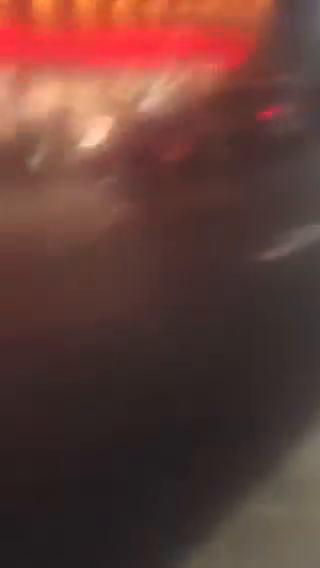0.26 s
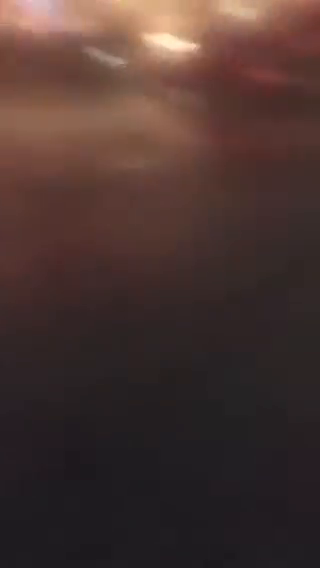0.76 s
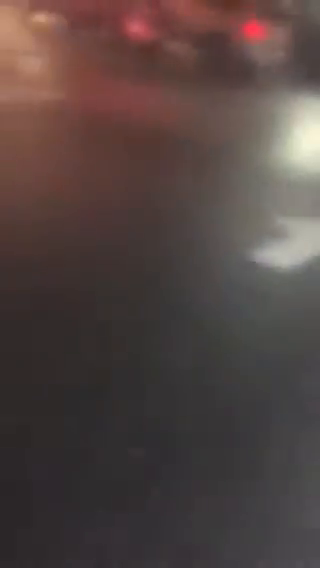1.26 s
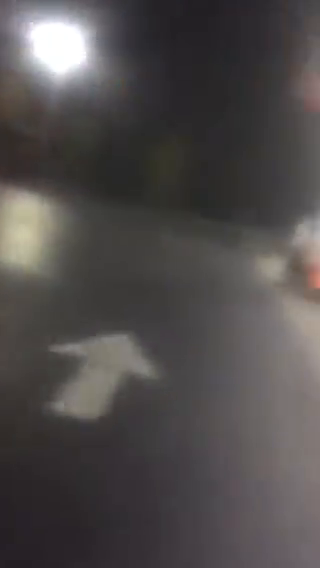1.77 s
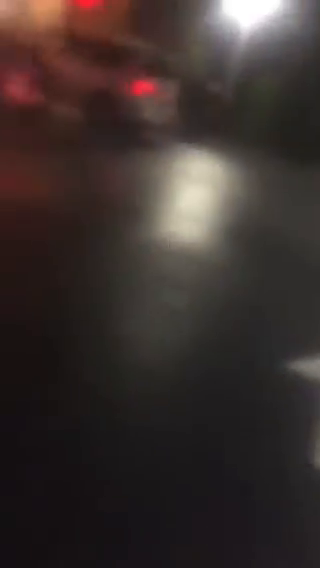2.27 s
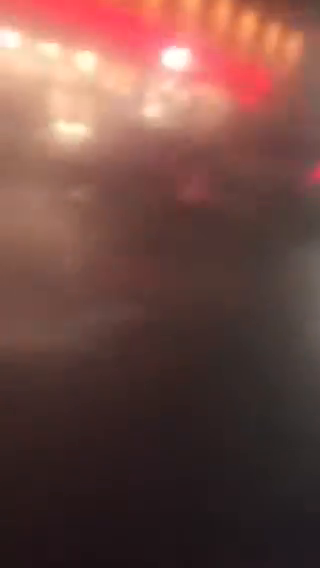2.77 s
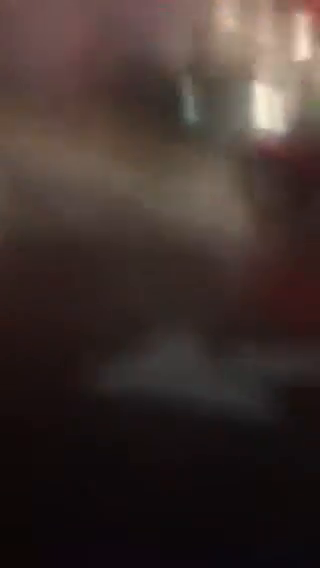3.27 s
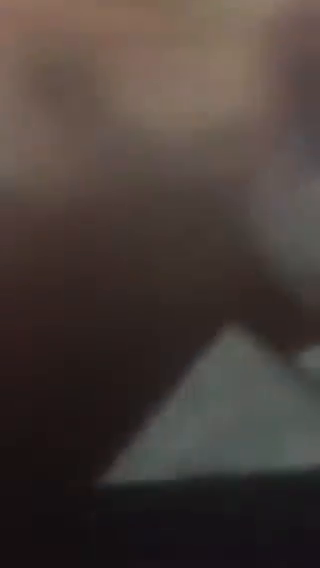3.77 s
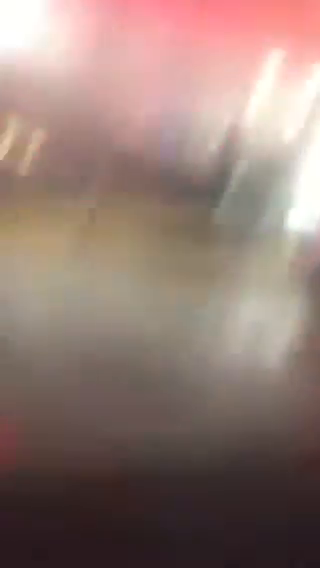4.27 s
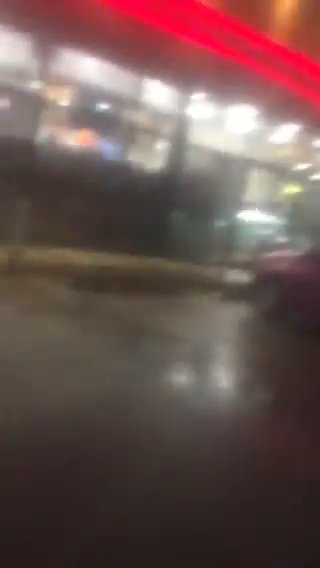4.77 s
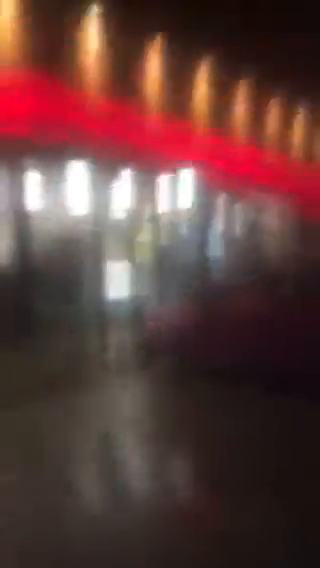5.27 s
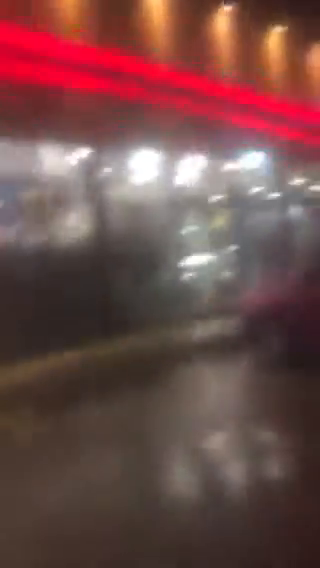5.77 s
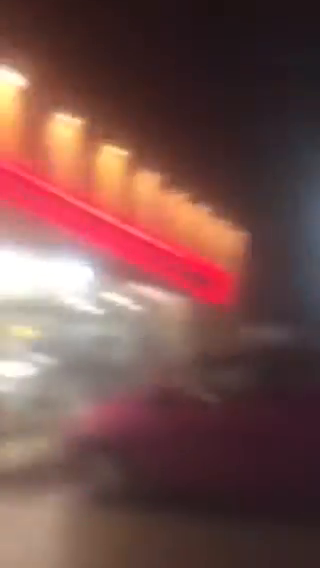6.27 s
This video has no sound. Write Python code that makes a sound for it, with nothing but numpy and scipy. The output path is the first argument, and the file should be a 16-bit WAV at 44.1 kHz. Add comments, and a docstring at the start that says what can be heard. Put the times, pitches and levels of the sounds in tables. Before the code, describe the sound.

Very close, dry outdoor sound of rain on an umbrella: irregular sharp splashes, hollow knocks and tiny ticks over faint hissing rain. Low gusts shake and rustle the fabric, strongest around three seconds, followed by crisp creasing snaps and a dense run of hits. Later the treble is slightly duller, and one smack overloads the microphone.

```python
"""A night downpour on wet pavement, heard from under an umbrella whose cloth is just above the microphone.
From the start, filtered noise makes the roar of rain, hissing spray, low buffeting and rustling cloth.
Light drops patter and heavy ones smack the cloth throughout: noise splashes with falling, knocking tones.
Wind swells near 1 s and strongest near 2.9 s; from 3.2 to 3.9 s the cloth snaps amid a thick run of drops.
The treble dulls a little until 4.7 s; the hardest smack, near 5.5 s, flattens against the microphone's limit."""
import sys
import numpy as np
from scipy import signal
from scipy.fft import rfft, irfft, next_fast_len
from scipy.io import wavfile

SR = 44100
rng = np.random.default_rng(int(sys.argv[2]) if len(sys.argv) > 2 else 0)


def dump_mix(stems):
    """Bounce the given channels to the path in sys.argv[1] as a 16-bit WAV at rate SR."""
    frames = np.atleast_2d(stems).T  # one column per channel
    limited = np.clip(frames, -1, 1)  # hard clip at full scale
    pcm = np.round(limited * 32767).astype(np.int16)
    wavfile.write(sys.argv[1], SR, pcm)


N = 287091
TIME = np.arange(N) / SR
AGE = np.arange(4096) / SR  # seconds since a drop or snap began


def gain_of(db):
    """Decibels to amplitude."""
    return 10 ** (np.asarray(db) / 20)


def evened(x):
    """Scales to an rms of one."""
    return x / np.sqrt(np.mean(x ** 2) + 1e-20)


def add(mix, s, sound):
    """Mixes a sound in at time s, cutting it off at the end of the mix."""
    part = mix[max(round(s * SR), 0):][:len(sound)]
    part += sound[:len(part)]


def coloured(x, spectrum):
    """Filters x by (frequency [Hz], level [dB]) points joined on a log-frequency axis."""
    hz, db = np.transpose(spectrum)
    size = next_fast_len(len(x))
    bins = np.fft.rfftfreq(size, 1 / SR)
    gain = gain_of(np.interp(np.log(bins + 1), np.log(hz), db))
    return irfft(rfft(x, size) * gain, size)[:len(x)]


def wander(rate_hz):
    """Slow random drift with an rms of about one: noise smoothed above rate_hz."""
    coarse = rng.standard_normal(4000)
    bins = np.fft.rfftfreq(len(coarse), TIME[-1] / len(coarse))
    smooth = irfft(rfft(coarse) / (1 + (bins / rate_hz) ** 2))
    return np.interp(TIME, np.linspace(0, TIME[-1], len(coarse)), evened(smooth))


def curves(table):
    """Each column of a table of (time [s], ...) points, joined by straight lines."""
    s, *columns = np.transpose(table)
    return [np.interp(TIME, s, column) for column in columns]


def burst(decay_s):
    """A puff of noise that starts at once and dies away."""
    return rng.standard_normal(len(AGE)) * np.exp(-AGE / decay_s)


def flex(hz, sag_cycles, life_cycles):
    """Cloth swings ever slower as the dent spreads: a short falling knock, uneven from swing to swing."""
    turns = sag_cycles * np.log1p(hz * AGE / sag_cycles)
    # a random phase shift at every half swing
    unevenness = np.interp(2 * turns, np.arange(64), rng.standard_normal(64)) * .11
    attack = 1 - np.exp(-turns / .3)
    decay = np.exp(-(turns / life_cycles) ** 1.5)
    return attack * decay * np.sin(2 * np.pi * (turns + unevenness))


# tone of the rain's roar: (frequency [Hz], relative level [dB])
WASH_TONE = [(80, -10.5), (250, 3), (600, 18), (1200, 6), (2300, 7), (4000, 2), (5200, -8), (9000, -46)]


def wash(rain_db, level_db=-5.5, flutter_db=3.0):
    """Countless faint drops blur into a roar of noise that flutters at random."""
    roar = evened(coloured(rng.standard_normal(N), WASH_TONE))
    return roar * gain_of(rain_db + level_db + flutter_db * wander(rate_hz=69))


# tone of the spray: (frequency [Hz], relative level [dB])
SPRAY_TONE = [(300, -15), (1500, 13), (3000, 0), (4900, 4), (6000, 4.5), (10500, 1.5), (11800, 3),
              (15500, -6)]
# swells of the spray, before its overall level: (time [s], level [dB])
HISS_SWELLS = [(0,-42),(.63,-41),(.71,-50),(.9,-56),(1.2,-46.5),(1.34,-57),(1.85,-53),(2.6,-62.5),(2.85,-59),(3.06,-58),(3.4,-53),(4.35,-60),(4.59,-53),(4.74,-57.5),(5.47,-48),(5.61,-62.5),(6.51,-53)]


def spray(level_db=3.5, ticks_db=-3):
    """Tiny ticks of drops on the nearby pavement merge into the hiss of those further off."""
    hiss_db, = curves(HISS_SWELLS)
    # about 260 ticks a second, a few much bigger than the rest
    landed = rng.random(N) < 260 / SR
    sizes = gain_of(7 * np.minimum(rng.exponential(1, N), 3)) * landed
    power = signal.oaconvolve(sizes ** 2, np.exp(-AGE / 0.00018))[:N]
    ticks = evened(coloured(np.sqrt(abs(power)) * rng.standard_normal(N), SPRAY_TONE))
    hiss = evened(coloured(rng.standard_normal(N), SPRAY_TONE))
    return gain_of(hiss_db + level_db) * (gain_of(ticks_db) * ticks + hiss)


# tone of the wind on the canopy: (frequency [Hz], relative level [dB])
WIND_TONE = [(20, -44), (38, -31), (65, 0.5), (130, 0.5), (250, -1.5), (600, -19.5), (2000, -44)]


def buffeting(wind_db, level_db=-3, lumps_db=6.5):
    """Gusts shake the canopy in low lumps: rumbling noise with a drifting level."""
    rumble = evened(coloured(rng.standard_normal(N), WIND_TONE))
    return rumble * gain_of(wind_db + level_db + lumps_db * wander(rate_hz=21))


# tone of the rubbing cloth: (frequency [Hz], relative level [dB])
RUSTLE_TONE = [(300, 1), (800, 12.5), (2200, 17), (4300, -12.5), (6000, -24), (12000, -45)]


def rustle(wind_db, level_db=-13, clump_db=4):
    """The wet cloth rubs on its ribs in clumps of fine grains as the wind shakes it."""
    rough = rng.standard_normal(N) * gain_of(12 * wander(rate_hz=67))
    grains = evened(coloured(rough, RUSTLE_TONE))
    return grains * gain_of(wind_db + level_db + clump_db * wander(rate_hz=24))


# tone of the splashes: (frequency [Hz], level [dB])
SPLASH_TONE = [(100, -2), (1000, 10), (3000, 8.5), (4900, 1), (6200, 1), (9500, -2.5), (10500, -5.5),
               (11800, -5), (15500, -11)]
LEAD = 32  # samples of room ahead of each drop
# a drop's slap and ring relative to its force, and the slap's pitch over the ring's
SLAP_DB, RING_DB, SLAP_RATIO = -1.5, -1.5, 2.053
# slacker cloth thumps and rings more but slaps less: dB of that trade per dB of thump above TAUT_DB
SLACK_TRADE, TAUT_DB = 0.11, -15.5
# at TAUT_DB: swings the ring lasts, and its sag: the pitch halves after this many starting periods
# slack cloth shortens both [octaves per dB of thump]
RING_CYCLES, SAG_CYCLES, SLACK_DAMPING = 3.19, 6.64, 0.013
# the wave returns from the nearest rib: level [dB], shortest and longest delay [s]
RIB_DB, RIB_NEAR_S, RIB_FAR_S = -10, .0008, 0.002694


def drop(force_db, splash_db, thump_db, hz):
    """Water bursts and the cloth slaps and rings, echoing off a rib, as the whole panel heaves."""
    slack_db = SLACK_TRADE * (thump_db - TAUT_DB)
    taut = 2 ** (SLACK_DAMPING * (TAUT_DB - thump_db))
    # a sharp burst with a faint, longer tail
    splash = burst(decay_s=.001) + gain_of(-35) * burst(decay_s=.004)
    splash = gain_of(splash_db) * coloured(np.roll(splash, LEAD), SPLASH_TONE)
    slap = gain_of(SLAP_DB - slack_db) * flex(SLAP_RATIO * hz, sag_cycles=14.3, life_cycles=3.52)
    ring = flex(hz, sag_cycles=SAG_CYCLES * taut, life_cycles=RING_CYCLES * taut)
    knock = slap + gain_of(RING_DB + slack_db) * ring
    rib_s = RIB_NEAR_S + (RIB_FAR_S - RIB_NEAR_S) * rng.random()
    knock = knock + gain_of(RIB_DB) * np.roll(knock, round(SR * rib_s))
    heave = flex(349, sag_cycles=0.99, life_cycles=2.01)
    thump = gain_of(thump_db) * heave * (1 - np.exp(-AGE / 0.0017)) * np.exp(-AGE / 0.011)
    # seams scatter the wave back across the cloth
    scatter = gain_of(-37.5) * signal.fftconvolve(knock, burst(decay_s=0.0061))[:len(AGE)]
    return gain_of(force_db) * (splash + np.roll(knock + thump + scatter, LEAD))


# light drops: base level in average rain, dB gained per dB of rain, smallest-to-largest range
PATTER_DB, PATTER_FOLLOW, PATTER_RANGE_DB = -31.5, 0.5, 13.5
# their average splash and thump relative to their force, and middle ring pitch
PATTER_SPLASH_DB, PATTER_THUMP_DB, PATTER_HZ = -7.5, -11.5, 842


def light_drops(rain_db, count=680):
    """Smaller drops all over the canopy, each with a pitch of its own, land harder as the rain swells."""
    out = np.zeros(N)
    blow_db = PATTER_DB + PATTER_FOLLOW * (rain_db - rain_db.mean())
    for at in rng.integers(0, N, count):
        splash, thump, octaves = rng.standard_normal(3) * [6, 7, .6]
        # most are small, a few large
        force_db = blow_db[at] + PATTER_RANGE_DB * rng.random() ** 2.5
        hz = PATTER_HZ * 2 ** octaves
        add(out, at / SR, drop(force_db, PATTER_SPLASH_DB + splash, PATTER_THUMP_DB + thump, hz))
    return out


# wet cloth snapping at its creases as it is shaken, before the overall level: (time [s], level [dB])
CREASE_SNAPS = [(3.1736, -7.5), (3.3372, -4), (3.3753, 3.5), (3.4322, -6), (3.4525, -11), (3.75, -2),
                (3.9327, -4)]
# tone of the snaps and crinkles: (frequency [Hz], level [dB])
CREASE_TONE = [(800, 0), (3000, -3.5), (11000, -8), (15500, -0.5)]


def creases(wind_db, level_db=-2, count=300, crinkle_db=-3):
    """Short noise bursts: crisp snaps of the cloth, and a fine crinkling that grows with the wind."""
    out = np.zeros(N)
    for s, db in CREASE_SNAPS:
        add(out, s, gain_of(db + level_db) * burst(decay_s=0.0013))
    for at in rng.integers(0, N, count):
        size_db = 8 * rng.uniform(-1, 1)
        add(out, at / SR, gain_of(wind_db[at] + crinkle_db + size_db) * burst(decay_s=0.0012))
    return coloured(out, CREASE_TONE)


# heavy drops on the canopy: (time [s], force [dB], splash [dB re force], thump [dB re force],
# starting pitch of the ring [Hz])
HEAVY_DROPS = [(0.0155,-14.5,-15,-32,1310),(0.2702,-14.5,-1,-38,1370),(0.3447,-14,-3,-5,760),
               (0.364,-2,-2,-23,1280),(0.4633,-21,13,4.5,1520),
               (.506,-12,2.5,4,1020),(.575,3.5,-2,-49,1444),(.5984,-9,-9,-14,690),
               (0.6591,5,5.5,-11,995),(0.7983,0,3.5,1.5,1083),
               (0.8123,-10,-30,-4,980),(.9134,-12,-8.5,-29,518),(1.032,-13,-20,-4,760),(1.0962,-12.5,-2,-74,890),(1.1194,-19,9,-22,940),
               (1.1947,-3.5,7.5,-32,1243),(1.3184,-4,1.5,5,1230),(1.3576,-20.5,11,-17,1310),(1.537,-3,-1,-2,1053),
               (1.5407,1,4,3.5,616),(1.819,-10,-6,-41,950),(1.827,-3.5,2.5,0.5,796),(1.8971,-1,-6,-3.5,803),
               (2.082,-6.5,4,-27,675),(2.112,-10,-12,-18,1270),(2.1625,-19,5,-7,920),(2.1719,-9.5,9.5,-19,673),
               (2.2236,-9,13,-18,880),(2.4114,1,0.5,-13,1290),(2.4765,-4.5,-2.5,2.5,1035),(2.653,-8.5,4,-43,605),
               (2.7792,-8.5,-7.5,1.5,760),(2.87,-4.5,-12,3,526),(2.9592,-3,-4,-14,1030),(2.9678,-4.5,-9,-6,940),
               (3.055,-11.5,-6,-11,960),(3.0997,-7.5,-9,-3,833),(3.2945,-5.5,-8.5,-15,780),(3.325,-10.5,-15,-13,786),(3.4075,-25,12,-19,1190),
               (3.4935,-0.5,2,3.5,725),(3.5435,-8.5,0,3,844),
               (3.5603,1,-12,4,503),(3.5825,-6,1.5,0,450),(3.602,-4.5,-9,-30,890),(3.6878,-2,-5,6,546),
               (3.7503,-9.5,-5,-9,655),(3.813,0.5,-0.5,-6,278),(3.8716,-6.5,-7,-57,934),(3.906,-4,-6.5,-8,733),
               (3.9355,-14,-1,-3,343),(3.9995,-11.5,-1,-30,1310),(4.2022,1,1,4.5,927),(4.364,-10,-10,-12,790),
               (4.4271,-7,-30,2.5,1070),(4.572,2,-14,-3,990),(4.6398,5.5,-12,6.5,497),(4.6541,-8,-13,3,810),
               (4.805,-19.5,1.5,14.5,510),(4.824,-21,-5,7,706),(4.8487,-13.5,-8.5,-38,960),(4.919,-22.5,5,-27,680),(5.154,-16.5,-3.5,-53,1130),
               (5.1838,-16,-3,-40,720),(5.2405,-13.5,-11,-25,1050),(5.2532,-13,-11,-9,695),(5.308,-2,-27,-22,963),
               (5.3654,-5,0.5,-28,487),(5.4393,-9,-14,-6,1110),(5.4818,-10,-3,6,312),(5.5238,9.5,5,-7,913),
               (5.6914,-3,5,-21,765),(5.7187,-3.5,-4,-10,926),(5.7613,-2.5,-5,-11,870),(5.7752,4.5,-8,-7,802),
               (5.9919,-1,-5.5,-22,632),(6.074,-19,-7.5,-9,690),(6.15,-15,-2.5,4.5,540),(6.196,-11,-2,-48,1170),
               (6.2657,-12,-2.5,-20,663),(6.2925,-17,-3,-27,710),(6.3966,-2,-1,-17,1230),(6.4091,-7.5,6,8.5,840),
               (6.4803,-15,-4,-32,694)]


def heavy_drops(count=2, droplet_db=-11):
    """Big drops land right above the microphone; each flings droplets that tick as they fall back."""
    out = np.zeros(N)
    for s, force_db, splash_db, thump_db, hz in HEAVY_DROPS:
        add(out, s - LEAD / SR, drop(force_db, splash_db, thump_db, hz))
        for flight, size, pitch in rng.random((count, 3)):
            tick = flex(1500 + 2000 * pitch, sag_cycles=12, life_cycles=2) + burst(decay_s=.0005) / 2
            tick_db = min(force_db, -2) + droplet_db - 14 * size
            add(out, s + .002 + .022 * flight ** 2, gain_of(tick_db) * tick)
    return out


# the microphone turns away and the top octave is shaded: (time [s], treble level [dB])
TREBLE_SHADE = [(0, 3), (4.3, 0.5), (4.7, 0)]


def shaded(rain):
    """A microphone turning away hears less treble: the top band is rescaled over time."""
    shade_db, = curves(TREBLE_SHADE)
    top = coloured(rain, [(7000, -40), (11000, 0)])
    return rain + top * (gain_of(shade_db) - 1)


# gusts, before each layer's own level: (time [s], rain on the canopy [dB], wind buffeting [dB])
GUST_SWELLS = [(0,-32.5,-40),(.62,-32,-32),(.71,-45,-36),(1.02,-40.5,-25.5),(1.08,-38,-48),(1.45,-45.5,-51),(2.02,-50,-49),(2.13,-48.5,-48),(2.28,-48,-46),(2.46,-48.5,-33.5),(2.66,-50,-35.5),(2.88,-26.5,-23.5),(3.21,-38,-31.5),(3.57,-22.5,-25.5),(3.69,-38.5,-29.5),(3.93,-34.5,-33),(4.0,-37.5,-34.5),(4.62,-32.5,-30.5),(4.71,-45,-33.5),(5.07,-48,-44.5),(5.38,-36.5,-37),(5.7,-45.5,-47),(6.51,-42.5,-51)]


def scene():
    """Gusts steer the canopy's layers and the roar; spray joins them at one microphone."""
    rain_db, wind_db = curves(GUST_SWELLS)
    surroundings = wash(rain_db) + spray()
    cloth = buffeting(wind_db) + rustle(wind_db) + creases(wind_db)
    drops = light_drops(rain_db) + heavy_drops()
    return shaded(surroundings + cloth + drops)[None]


OVERLOAD = .72  # amplitude the microphone cannot exceed
EDGE_HZ = 16100  # upper band limit


def record(dry):
    """The microphone sheds the deepest bass and flattens the loudest smacks; then the band limit."""
    thinned = signal.sosfilt(signal.butter(3, 42, "highpass", fs=SR, output="sos"), dry)
    clipped = thinned / (1 + (thinned / OVERLOAD) ** 6) ** (1 / 6)
    lowpass = signal.firwin(255, EDGE_HZ, window=("kaiser", 9), fs=SR)
    return signal.oaconvolve(clipped, lowpass[None], "same")


dry = scene()
out = record(dry)
dump_mix(out)
```